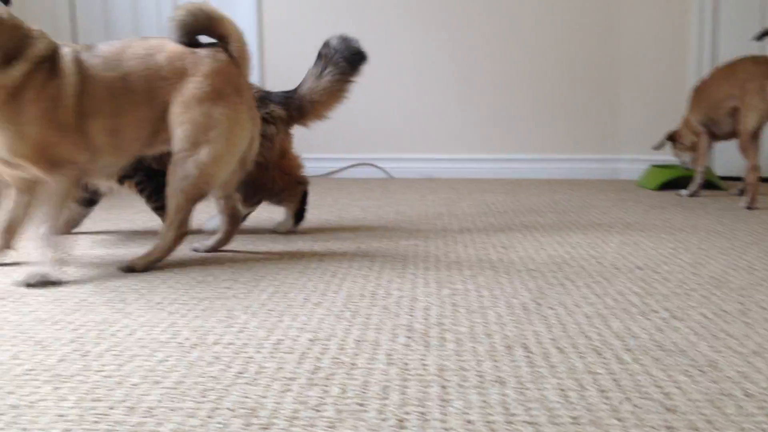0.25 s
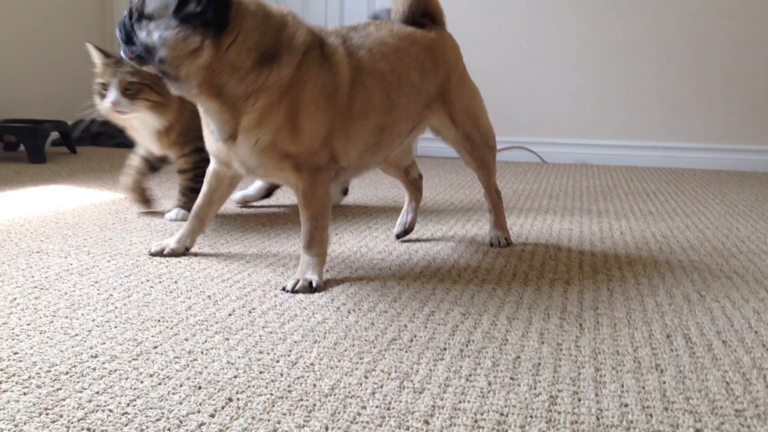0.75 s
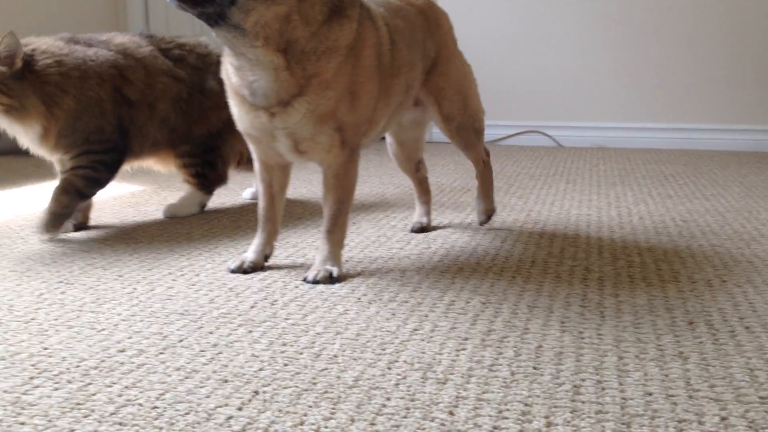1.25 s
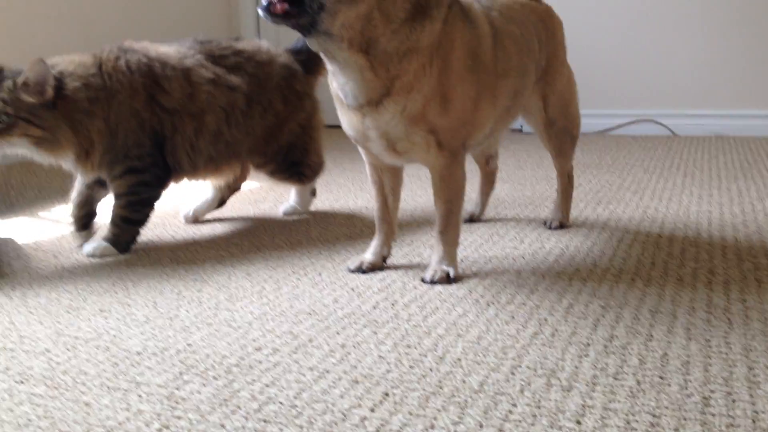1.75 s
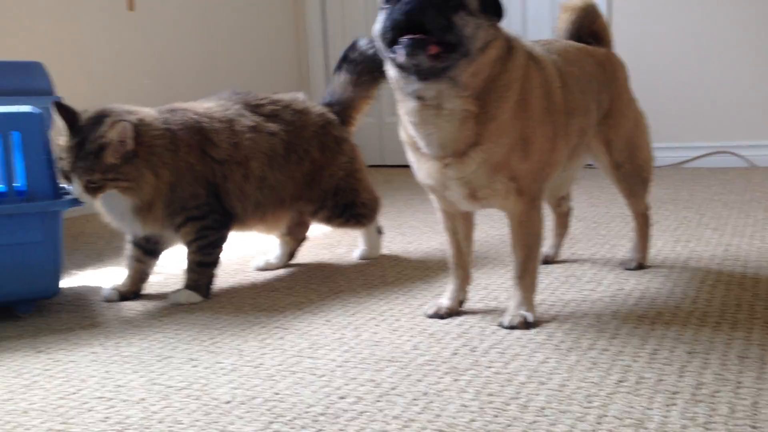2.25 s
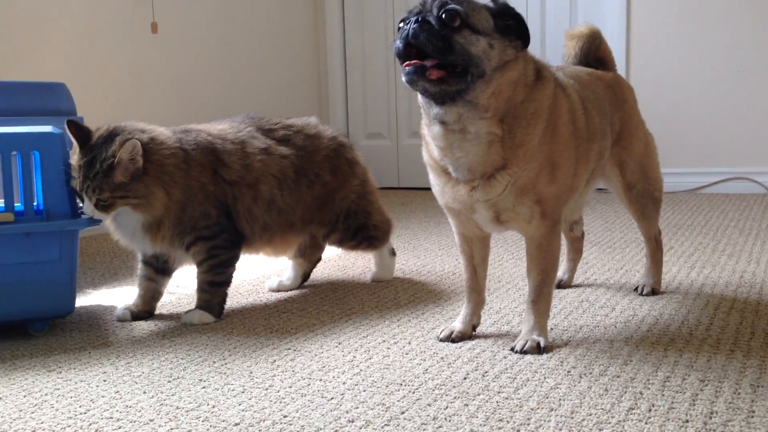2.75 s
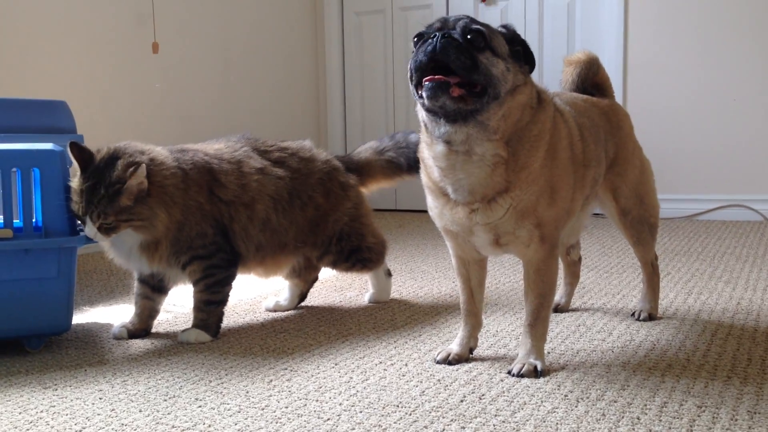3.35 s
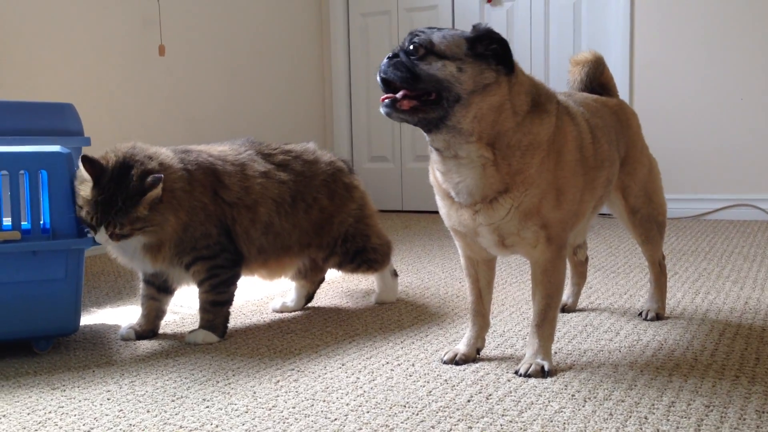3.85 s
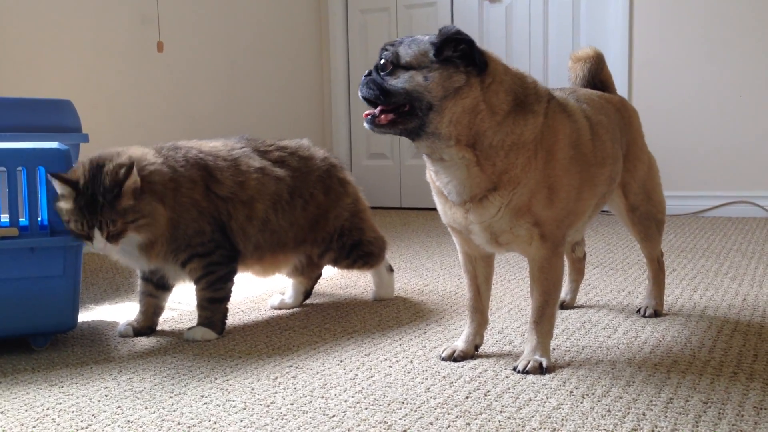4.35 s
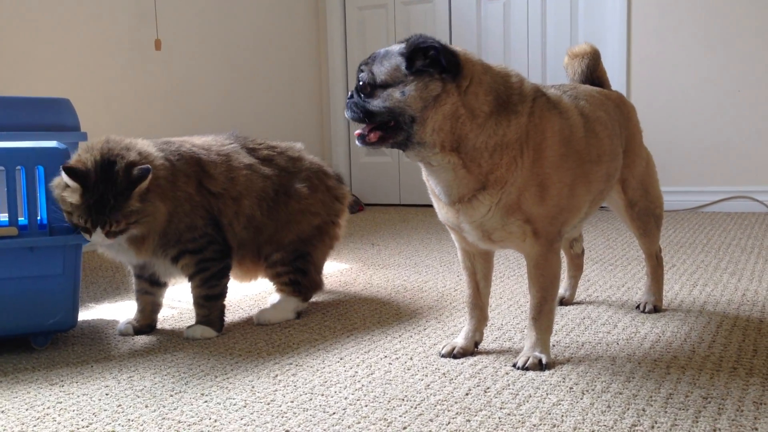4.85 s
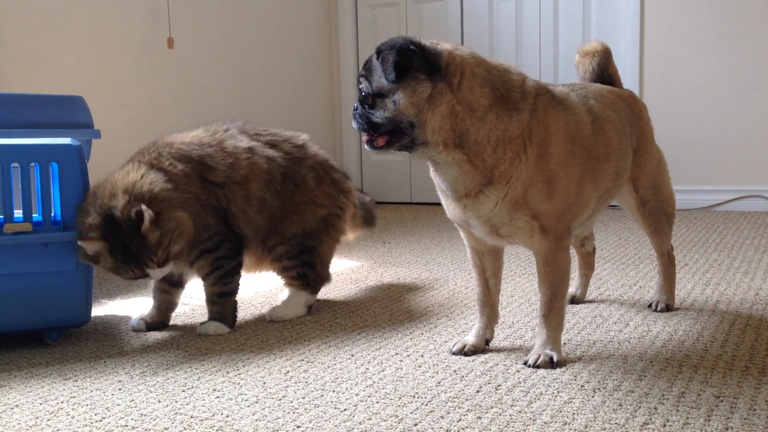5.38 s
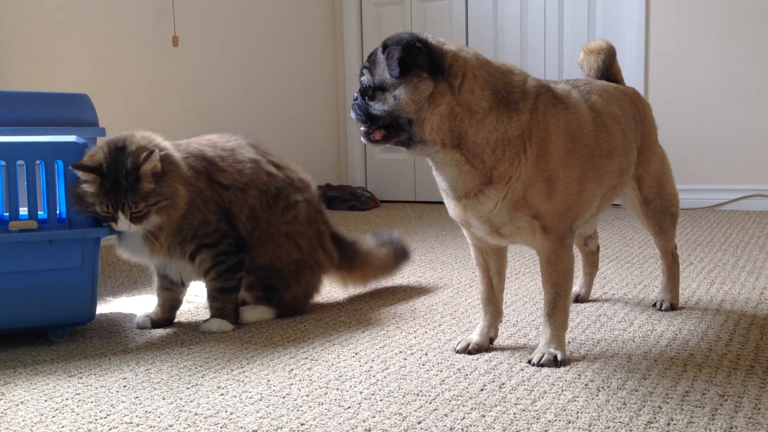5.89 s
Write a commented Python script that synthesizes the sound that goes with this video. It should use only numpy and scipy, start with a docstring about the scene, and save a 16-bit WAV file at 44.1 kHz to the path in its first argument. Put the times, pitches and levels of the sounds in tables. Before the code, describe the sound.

Paws thud softly on carpet, then a panting dog growls twice, low and snorty, before a hollow plastic box is nudged.

```python
"""In a carpeted room, a flat-faced dog pants and twice snores out a growl.
The growl comes from its palate (the soft roof of the mouth) flapping and ringing the chest and throat.
Panting is air rushing through the mouth; the nose whistles thinly and the lips smack.
Paws thud and scuff, a plastic box is nudged; short hisses make licks, rustles, wheezes and a snort.
A low rumble and a late hum waver under the hiss of the room."""
import sys
import numpy as np
from scipy import signal
from scipy.io import wavfile
from scipy.ndimage import uniform_filter1d

SR = 44100
rng = np.random.default_rng(int(sys.argv[2]) if len(sys.argv) > 2 else 0)


def put_to_file(sound):
    """Save the sound as 16-bit audio at rate SR, in the file named by the first command-line argument."""
    columns = np.atleast_2d(sound).T  # one column per channel
    safe = np.clip(columns, -1, 1)
    whole_steps = np.round(safe * 32767)
    wavfile.write(sys.argv[1], SR, whole_steps.astype(np.int16))


N = 269958

# how each growl unfolds, one table a growl: time_s, chest_db, throat_db, chest_pitch_factor
GROWLS = [
    [(1.599, -57, -51.5, 1.1), (1.641, -43, -54, 1.15), (1.783, -41, -44, 1.17),
     (1.847, -47.5, -50.5, 1.04), (1.919, -41, -52.5, 1.08), (2.089, -41, -48, 0.98),
     (2.183, -51, -60, 0.98), (2.28, -63, -69, 1)],
    [(2.591, -48.5, -52.5, 0.98), (2.63, -45.5, -53.5, 0.97), (2.667, -45, -44, 0.92),
     (2.74, -44.5, -52, 1), (2.80, -44, -44.5, .95), (2.873, -41, -44.5, 0.915), (3.0, -44.5, -44, .97),
     (3.03, -54, -53.5, 0.95), (3.13, -61, -73, 0.88)],
]
# the flapping palate, one table a growl: time_s, flaps_hz, roughness (0 to 1)
PALATE_FLUTTER = [
    [(1.599, 30.1, .85), (1.765, 30.1, .9), (1.78, 32.8, .92), (1.873, 32.8, .9), (1.888, 30.4, .85)],
    [(2.591, 30.1, .5), (2.75, 30.1, .4), (2.79, 30.1, .27), (3.0, 30.1, .27), (3.03, 30.1, .8)],
]
# how open the mouth is, one value a growl: throat_pitch_factor
GROWL_OPENINGS = [0.97, 0.98]
# resonances (pitches that ring) of the chest: pitch_hz, width_hz, gain_db
CHEST_RESONANCES = [(100, 41, 0), (195, 110, -20), (285, 90, -27)]
# resonances of the throat: pitch_hz, width_hz, gain_db
THROAT_RESONANCES = [(625, 120, -6), (1040, 170, -14), (1465, 170, 0), (1800, 420, -13), (2150, 500, -19)]
# upper resonances of the nose: pitch_hz, width_hz, gain_db
NOSE_RESONANCES = [(2640, 1260, 1), (3350, 1100, -0.5), (4780, 910, 0.5), (6510, 1070, -3.5),
                   (7980, 1800, -9.5), (9660, 1300, -11.5), (12500, 4400, -17.5)]
# breaths: start_s, swell_s, fade_s, level_db, swell_db, brightness_db_per_octave, mouth_pitch_factor
PANTS = [(0.0, 0.092, 0.29, -65, 6, 11, 0.88), (0.525, 0.022, 0.27, -62.5, -8, 2, .96),
         (0.84, 0.15, 0.22, -57, 2, -7, 1), (1.16, 0.2, 0.12, -43.5, 8.5, -.5, 1.034),
         (1.555, 0.018, 0.065, -55, -1, 1, 1.02), (2.198, .11, 0.23, -45.5, 4.5, 1.5, 1.02),
         (2.555, 0.045, 0.045, -54, 0.5, 1.5, 0.96), (3.09, 0.13, .22, -50.5, 14.5, 2, .97),
         (3.46, .05, 0.56, -72.5, -2, -0.5, 1), (3.815, 0.14, 0.19, -55.5, 8, 1, 0.97),
         (4.54, 0.061, 0.22, -57, 10.5, 0.5, 0.945), (4.82, 0.057, .1, -67, 10, 5, 1.15),
         (5.23, 0.14, .27, -63.5, 6.5, 0, 1.065), (6.0, .09, .15, -63.5, 15, -2.5, 0.97)]
# resonances of the open mouth: pitch_hz, width_hz
MOUTH_RESONANCES = [(800, 160), (1050, 190), (1400, 300), (1700, 250), (1950, 230), (2350, 330),
                    (2850, 400), (3300, 350), (3750, 400), (5300, 1800), (8000, 3500), (12000, 6000)]
# strength of each mouth resonance: gain_db
MOUTH_GAINS = [-3, -4.5, -8, -6, 1, -7, -11, -9.5, -8.5, -19.5, -29, -41.5]
# whistles of air in the nose: start_s, length_s, level_db, pitch_hz
WHEEZES = [(1.175, 0.067, -72, 3550), (3.461, 0.38, -73, 1905), (5.258, 0.19, -69.5, 3280),
           (5.29, .13, -67.5, 2350)]
# paws landing: start_s, level_db, boom_pitch_hz, scuff_gain_db
PAW_STEPS = [(0.254, -39, 81.5, -16.5), (0.348, -45.5, 196, 1), (0.376, -38.5, 88.8, -3),
             (0.429, -50, 93, -3.5), (0.529, -54, 85.4, 10), (0.598, -57.5, 81, 12.5),
             (0.716, -39.5, 125, 3.5), (0.759, -38.5, 87, -1), (0.798, -43, 85.4, -2),
             (0.889, -51, 82.4, 7), (0.989, -47, 186, -1.5), (1.039, -45, 132, -11), (4.225, -51, 207, -2)]
# nudges of the box: start_s, level_db
BOX_KNOCKS = [(3.3, -52), (3.777, -56), (4.619, -55.5), (4.962, -39), (5.07, -41.5), (5.454, -55),
              (5.491, -53.5), (5.811, -40.5)]
# tones of the hollow box: pitch_hz, gain_db, ring_s (time to fade by 60 dB)
BOX_TONES = [(235, -5, .12), (300, -1, .15), (355, 0, .16), (430, -4, .11), (570, -10, .07),
             (800, -10, .05)]
# short crackly hisses: start_s, level_db, pitch_hz, fade_s (time to fade by 60 dB)
# among them are breathy wheezes at 0 and 5.429 s, and a sharp snort in the first growl at 1.79 s
SHORT_HISSES = [(0, -52.5, 1150, 0.23), (0.808, -62.5, 10600, .11), (1.0, -66, 8600, 0.35),
                (1.79, -36.5, 1230, 0.052), (2.51, -69, 12770, .16), (2.6, -55.5, 8120, 0.099),
                (3.69, -64.5, 4070, .13), (3.69, -71, 9000, .1), (3.835, -54, 2850, 0.093),
                (3.852, -67, 9200, .25), (4.026, -57.5, 6700, .08), (4.115, -69, 4800, .6),
                (4.59, -66, 6500, .11), (4.69, -59, 4160, 0.14), (4.859, -59, 5100, 0.21),
                (5.429, -59, 3060, 0.3), (5.515, -61, 5880, 0.32), (5.679, -66, 8180, 0.4),
                (5.71, -64, 2370, .17), (5.765, -69, 6100, .57), (5.765, -64, 1350, 0.43),
                (5.796, -70, 4450, .32), (5.856, -66.5, 6900, .2)]
# fur and paws brushing the carpet: time_s, level_db
BRUSH_LEVELS = [(0.0, -57), (0.226, -64.5), (0.412, -58), (1.15, -61.5), (1.5, -59), (3.45, -68),
                (3.62, -77), (3.75, -65.5), (4.2, -62.5), (4.4, -70), (4.92, -64), (5.2, -65), (5.6, -68),
                (6.12, -70.5)]
# tone colour of that brushing: pitch_hz, gain_db
BRUSH_COLOUR = [(88, 17.5), (150, -18), (221, 5.5), (627, 1.5), (791, 4.5), (1160, -3.5), (5160, -6),
                (15200, -23)]
# rise and fall of the low rumble: time_s, level_db
RUMBLE_LEVELS = [(0.0, -82), (0.262, -63), (0.872, -54), (1.55, -74), (2.45, -67), (3.2, -66),
                 (4.02, -72.5), (4.5, -68), (4.9, -69), (5.4, -67), (6.12, -63)]
# tone colour of the rumble: pitch_hz, gain_db
RUMBLE_COLOUR = [(20, -5), (60, -22), (90, -1), (120, -7.5), (160, -19), (300, -18), (600, -55.5)]
# tone colour of the room hiss: pitch_hz, gain_db
HISS_COLOUR = [(88, -66), (150, -0.5), (592, -7), (718, -39), (1260, -6.5), (1440, -6), (1960, -5.5),
               (2830, -14.5), (3370, -17), (15200, -26)]


def growl(shape, flutter, opening, nose_db):
    """Each slap of the palate rings the chest and throat; it bounces, and air rasps past in puffs."""
    t, chest_db, throat_db, tightness = follow(shape)
    times, flaps_hz, roughness = np.transpose(flutter)
    rough = np.interp(t, times, roughness)
    flaps = np.cumsum(np.interp(t, times, flaps_hz)) / SR
    flap_number = flaps.astype(int)
    slaps = 1. * (np.diff(flap_number, prepend=-1) > 0)
    chance = rng.standard_normal((flap_number[-1] + 1, 4))[flap_number].T
    clicks = slaps * amp(2 * chance[0])
    # three weaker bounces follow, each a share of one flap after the slap
    for k, (share, db) in enumerate([(.22, -13), (.4, -14), (.58, -14)]):
        bounces = np.diff(np.floor(flaps - share), prepend=-1) > 0
        clicks += bounces * amp(db + 4 * chance[k + 1])
    soft_clicks = uniform_filter1d(uniform_filter1d(clicks, size=9), size=7)  # wet flesh dulls the edge
    # a spurt of air after each contact
    spurts = signal.lfilter([1], [1, -np.exp(-1 / (0.003 * SR))], clicks ** 0.36)
    lumps, wobble = drift(len(t), 200), drift(len(t), 500)
    airflow = 1.6 * rough * amp(2.9 * lumps) + evened(spurts)
    puffs = evened(airflow * rng.standard_normal(len(t)))
    chest = cavity(evened(slaps) + .6 * rough ** 2 * puffs, CHEST_RESONANCES, tightness)
    shaking = opening * (1 + .06 * rough ** 2 * wobble)  # a rough growl shakes the throat's shape
    throat = cavity((1 - rough) * evened(soft_clicks) + rough * puffs, THROAT_RESONANCES, shaking)
    slack_mouth_air = cavity(puffs, [(630, 240, 12), (1070, 1100, 2), (2000, 680, -7.5)])
    throat += 0.76 * rough ** 3 * slack_mouth_air
    rasp_db = nose_db + 0.59 * (throat_db + 50.5)  # the nose gets louder with the throat
    rasp = amp(rasp_db) * cavity(puffs, NOSE_RESONANCES)
    voice = amp(throat_db) * throat - amp(chest_db) * chest + rasp
    return t[0], voice * ramp(t[-1] - t, 0.035)


def pant(swell_s, fade_s, level_db, swell_db, brightness, opening):
    """Slightly lumpy air rushes through the open mouth: a quick start, a swell, a steepening fade."""
    t = np.arange(0, swell_s + fade_s, 1 / SR)
    rise_db = -swell_db * (1 - ramp(t, swell_s))
    flow_db = rise_db - 21.5 * ramp(t - swell_s, fade_s) ** 2.09
    lumps_db = 0.99 * drift(len(t), 250)
    widening = opening + .005 * rise_db  # the mouth widens as the breath swells
    tilt = brightness + 0.62 * flow_db  # stronger flow is brighter
    mouth = np.column_stack([MOUTH_RESONANCES, MOUTH_GAINS])
    air = cavity(rng.standard_normal(len(t)), mouth, widening, tilt)
    return amp(level_db + flow_db + lumps_db) * air * ramp(t, 0.0076)


def wheeze(length_s, level_db, pitch_hz):
    """Air whistles thinly in the nose: a narrow band of noise that comes and goes softly."""
    whistle = noise_band(round(length_s * SR), pitch_hz, width_hz=280)
    return amp(level_db) * whistle * signal.windows.tukey(len(whistle), .4)


def lip_smacks(per_second=10):
    """Tongue and lips make tiny wet clicks at random moments."""
    strength = amp(-54 + 3 * np.minimum(rng.exponential(1, N), 3))
    clicks = strength * (rng.random(N) < per_second / SR)
    return resonate(resonate(clicks, 6000, 5400), 6000, 4800)


def paw_step(level_db, pitch_hz, scuff_db, fade_s=0.16):
    """A landing paw makes the floor boom and gives the carpet a dull scuff."""
    t = np.arange(SR // 3) / SR
    boom = np.sin(2 * np.pi * pitch_hz * t) * decay(t, fade_s)
    noise = resonate(rng.standard_normal(len(t)), 600, 1000)
    carpet = evened(resonate(noise, 400, 350) + .7 * resonate(noise, 820, 350))
    scuff = .5 * amp(scuff_db) * carpet * decay(t, 1.2 * fade_s)
    return amp(level_db) * (boom + scuff) * ramp(t, .008)


def box_knock(level_db, scrape_db=-16.5):
    """A soft blow rings the hollow plastic, a little off pitch by where it lands, and scrapes briefly."""
    t = np.arange(SR // 3) / SR
    tones = np.zeros(len(t))
    for pitch_hz, gain_db, ring_s in BOX_TONES:
        louder, higher = rng.standard_normal(2)
        tone = np.sin(2 * np.pi * pitch_hz * (1 + 0.021 * higher) * t)
        tones += amp(gain_db + 2 * louder) * tone * decay(t, ring_s)
    blow = rng.standard_normal(900) * np.exp(-t[:900] / 0.01)
    ring = signal.fftconvolve(tones, blow)[:len(t)]
    scrape = noise_band(len(t), 1560, 2500) * (decay(t, 0.025) + 0.48 * decay(t, 0.44))
    return amp(level_db) * (ring / abs(ring).max() + amp(scrape_db) * scrape) * ramp(t, 0.0017)


def short_hiss(level_db, pitch_hz, fade_s, crackle_db=3.5):
    """A sudden burst of crackly noise around one pitch, dying away."""
    t = np.arange(SR // 2) / SR
    width_hz = 200 + .06 * pitch_hz
    crackle = amp(crackle_db * drift(len(t), 60)) * rng.standard_normal(len(t))
    band = evened(resonate(resonate(crackle, pitch_hz, width_hz), pitch_hz, 2 * width_hz))
    return amp(level_db) * band * decay(t, fade_s) * ramp(t, .006) * ramp(t[-1] - t, .1)


def carpet_brushing():
    """Fur and paws brush the carpet, making a noise that swells and sinks."""
    return level_curve(BRUSH_LEVELS) * coloured_noise(BRUSH_COLOUR, drift_db=1.5)


def hum(start_s=5.45, rise_s=0.29, level_db=-62.5):
    """A low, wavering tone fades in near the end and stays."""
    tone = noise_band(N, pitch_hz=103, width_hz=18.5)
    return amp(level_db) * tone * ramp(np.arange(N) / SR - start_s, rise_s)


def rumble_and_hiss(hiss_db=-72.5):
    """A low rumble rises and falls under the faint hiss of the room."""
    rumble = level_curve(RUMBLE_LEVELS) * coloured_noise(RUMBLE_COLOUR, drift_db=1.5)
    return rumble + amp(hiss_db) * coloured_noise(HISS_COLOUR, drift_db=1.2)


def room_echo(sound, bass_fade_s=.33):
    """Sound bounces around the room; carpet soaks up the treble first, thin walls let the bass out."""
    echoes = np.zeros(SR // 2)
    slots = np.arange(260, len(echoes) - 20, 20)
    echoes[slots + rng.integers(0, 20, len(slots))] = rng.choice([-1., 1.], len(slots))
    hz, t, spectrum = signal.stft(echoes, SR, nperseg=256)
    fade_s = bass_fade_s / (1 + hz / 9000)
    tail = signal.istft(spectrum * decay(t, fade_s[:, None]), SR, nperseg=256)[1]
    tail = signal.sosfilt(signal.butter(2, 220, "highpass", fs=SR, output="sos"), tail)
    return signal.fftconvolve(sound, tail / np.linalg.norm(tail))[:N]


def cavity(sound, resonances, pitch_factor=1, tilt_db_per_octave=0):
    """A hollow space rings at several pitches at once; its loudness is then held even."""
    total = 0
    for k, (hz, width_hz, db) in enumerate(resonances):
        pitch_hz = hz * pitch_factor
        ring = resonate(resonate(sound, pitch_hz, width_hz), pitch_hz, width_hz)
        gain = amp(db + tilt_db_per_octave * np.log2(hz / 2000))
        total += (-1) ** k * gain * ring  # every second one is flipped
    return total / np.sqrt(uniform_filter1d(total ** 2, size=4400) + 1e-20)


def resonate(sound, pitch_hz, width_hz):
    """Keeps the sound near one pitch: shifts that pitch down to zero, smooths, and shifts back."""
    shift = np.exp(2j * np.pi * np.cumsum(pitch_hz * np.ones(len(sound))) / SR)
    memory = np.exp(-np.pi * width_hz / SR)
    return 2 * (shift * signal.lfilter([1 - memory], [1, -memory], sound / shift)).real


def noise_band(samples, pitch_hz, width_hz):
    """Noise narrowed twice around one pitch."""
    once = resonate(rng.standard_normal(samples), pitch_hz, width_hz)
    return evened(resonate(once, pitch_hz, width_hz))


def coloured_noise(colour, drift_db):
    """Noise with a given tone colour, whose level drifts in patches of time and pitch."""
    hz = np.fft.rfftfreq(1024, 1 / SR)
    pitch_hz, gain_db = np.transpose(colour)
    colour_db = np.interp(np.log(hz + 1), np.log(pitch_hz + 1), gain_db)
    real, imaginary, patches = rng.standard_normal((N // 256 + 5, 513, 3)).T
    patches = evened(uniform_filter1d(uniform_filter1d(patches, size=14, axis=0), size=10, axis=1))
    spectrum = (real + 1j * imaginary) * amp(colour_db[:, None] + drift_db * patches)
    return evened(signal.istft(spectrum, nperseg=1024, noverlap=768)[1][:N])


def drift(samples, smoothing):
    """A random wiggle; more smoothing makes it slower."""
    return evened(uniform_filter1d(rng.standard_normal(samples), size=smoothing))


def follow(rows):
    """Gives sample times and each column of a table traced along them."""
    times, *columns = np.transpose(rows)
    t = np.arange(times[0], times[-1], 1 / SR)
    return [t] + [np.interp(t, times, column) for column in columns]


def level_curve(rows):
    """Turns a table of levels into a gain for the whole scene."""
    return amp(np.interp(np.arange(N) / SR, *np.transpose(rows)))


def ramp(t, length_s):
    """Climbs from 0 to 1 in length_s, then stays."""
    return np.clip(t / length_s, 0, 1)


def decay(t, fade_s):
    """Falls by 60 dB every fade_s."""
    return amp(-60 * t / fade_s)


def amp(db):
    """Turns decibels into a gain."""
    return 10 ** (np.asarray(db) / 20)


def evened(sound):
    """Scales a sound to an average power of 1."""
    return sound / np.sqrt(np.mean(sound ** 2) + 1e-20)


def add(mix, start_s, sound):
    """Mixes a sound in at start_s."""
    part = mix[round(start_s * SR):][:len(sound)]
    part += sound[:len(part)]


def scene(echo_db=-11):
    """The dog, the box and the short hisses echo in the room, over the background noises."""
    near = lip_smacks()
    nose_levels_db = (-57.5, -61.5)  # one for each growl
    for settings in zip(GROWLS, PALATE_FLUTTER, GROWL_OPENINGS, nose_levels_db):
        add(near, *growl(*settings))
    events = [(paw_step, PAW_STEPS), (box_knock, BOX_KNOCKS), (short_hiss, SHORT_HISSES),
              (pant, PANTS), (wheeze, WHEEZES)]
    for source, table in events:
        for start_s, *settings in table:
            add(near, start_s, source(*settings))
    background = rumble_and_hiss() + carpet_brushing()
    return (near + amp(echo_db) * room_echo(near) + background + hum())[None]


def record(dry, low_hz=62, high_hz=15350):
    """A small microphone loses the deep bass; the highest treble is cut off too."""
    thin = signal.sosfilt(signal.butter(2, low_hz, "highpass", fs=SR, output="sos"), dry)
    treble_cut = signal.firwin(511, high_hz, window=("kaiser", 9), fs=SR)
    return signal.oaconvolve(thin, treble_cut[None], "same")


dry = scene()
out = record(dry)
put_to_file(out)
```